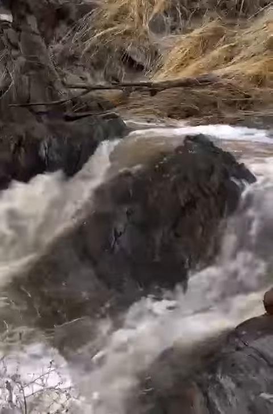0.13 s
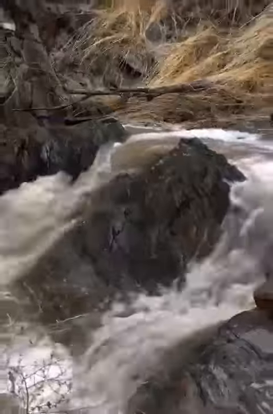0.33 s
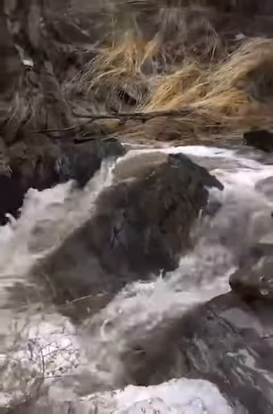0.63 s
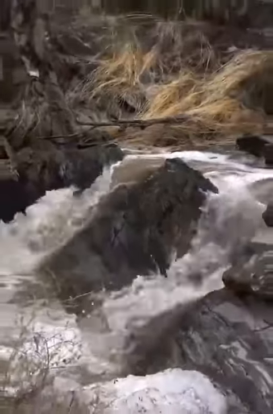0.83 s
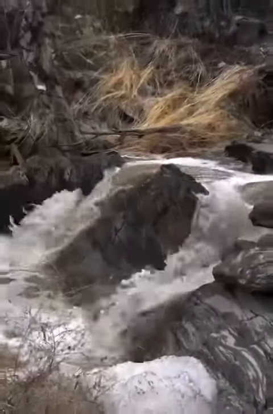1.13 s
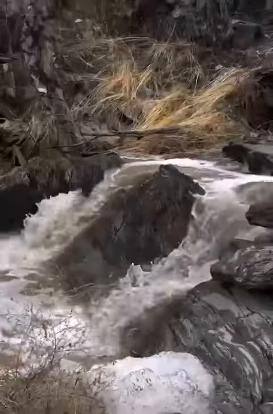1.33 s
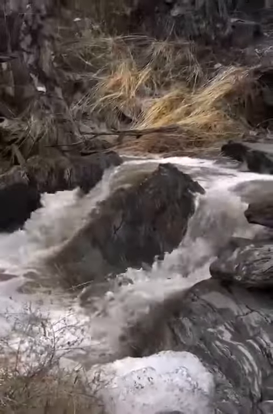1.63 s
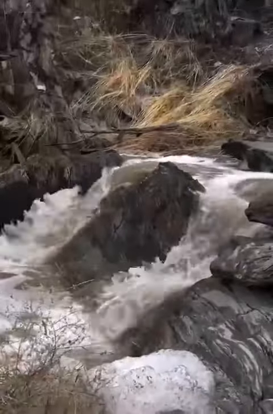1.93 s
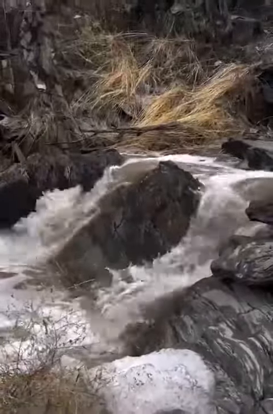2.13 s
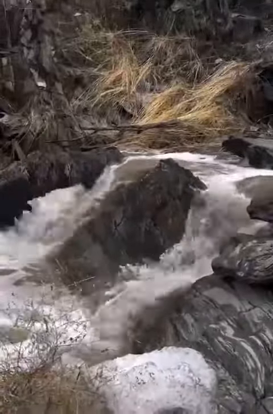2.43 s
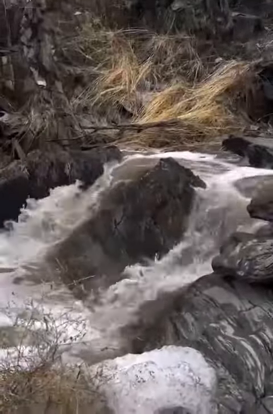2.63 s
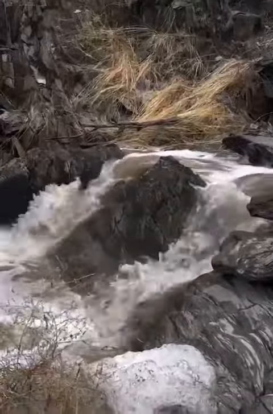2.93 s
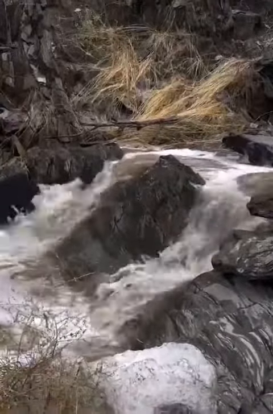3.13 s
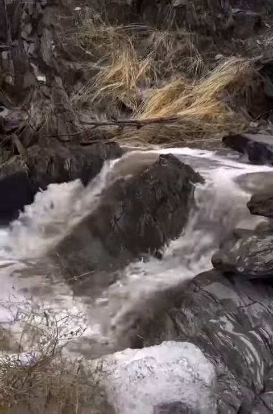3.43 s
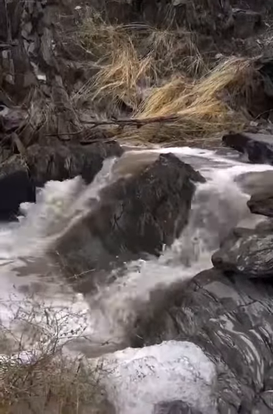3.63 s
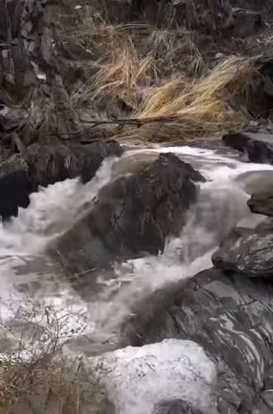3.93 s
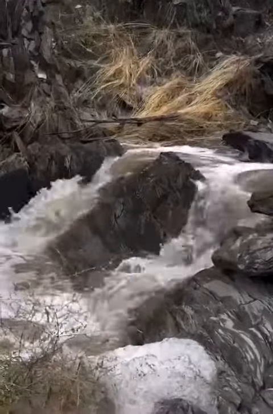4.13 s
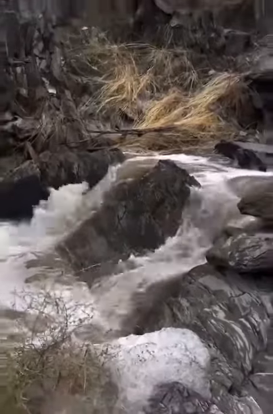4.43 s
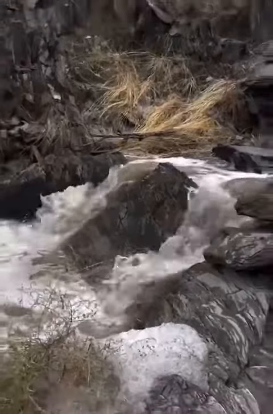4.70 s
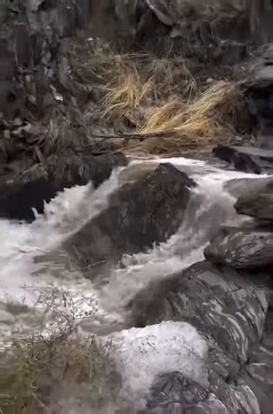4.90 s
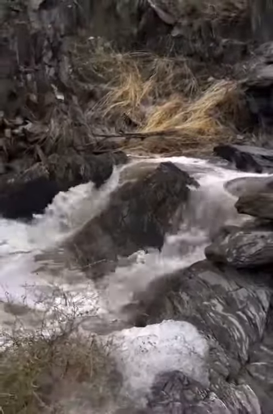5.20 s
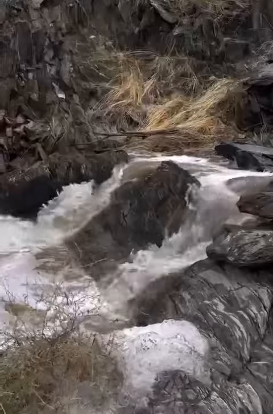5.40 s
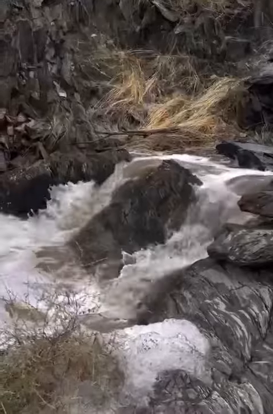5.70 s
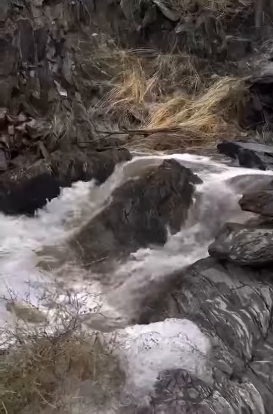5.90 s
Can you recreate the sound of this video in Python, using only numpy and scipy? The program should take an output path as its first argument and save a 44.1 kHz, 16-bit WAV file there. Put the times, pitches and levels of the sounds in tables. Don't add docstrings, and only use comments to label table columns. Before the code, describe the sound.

Outdoors, close to a swollen stream: dense, steady white-water rush, wide in stereo, with fine spray and bubbles. Air thumps the microphone at the start, hardest at a quarter second. Beneath the water, a deep engine drone climbs and strengthens, drops away during a gear shift, sinks in pitch, then slowly builds again from about three and a half seconds until a closing wind bump.

```python
import sys
import numpy as np
from scipy import signal
from scipy.fft import rfft, irfft, next_fast_len
from scipy.io import wavfile
from scipy.ndimage import uniform_filter1d

SR = 44100
rng = np.random.default_rng(int(sys.argv[2]) if len(sys.argv) > 2 else 0)


def dump(signal):
    limited = np.clip(np.atleast_2d(signal).T, -1, 1)
    pcm = np.round(limited * 32767).astype(np.int16)
    wavfile.write(sys.argv[1], SR, pcm)


def gain_from_db(level_db):
    decades = np.asarray(level_db, float) / 20
    return 10 ** decades


N = 267025

# (time [s], roar level [dB])
FLOW = [(0, -32), (1.7, -31.5), (2.1, -32.5), (3.5, -33), (4.2, -32), (6.05, -31.5)]
# (time [s], half length [s], lift [dB])
SLOSH = (1.82, 0.09, 2.4)
SPRAY_DB = 0.36
# (frequency [Hz], density [dB per Hz])
ROAR_SPECTRUM = [(40, -34), (90, -2), (200, -4.5), (400, -7.5), (800, -5.5), (1500, -11), (2500, -16),
                 (4000, -18.5), (5000, -20.5), (7000, -21), (9500, -18), (10900, -12.5), (11500, -15.5),
                 (11900, -32.5)]
# (pitch [Hz], ring [cycles], level [dB], rate [bubbles per s])
BUBBLE_SIZES = [(512, 9.2, -47.5, 60), (773.4, 10, -41.5, 120), (1304, 9.1, -43, 230),
                (2227, 13.3, -44, 540), (3873, 3.7, -47, 900), (7300, 3.6, -57.5, 1800)]

# (frequency [Hz], left-right likeness [0-1])
PORT_LIKENESS = [(250, 1.0), (500, .82), (1100, .7), (1450, .975), (2000, .995), (2750, .93), (3600, .95),
                 (4400, .86), (4890, .993), (6200, .99), (7200, .8), (8150, .97), (8500, .995),
                 (10800, .86)]
# (frequency [Hz], left over right [dB])
PORT_BALANCE = [(110, .5), (200, 1.6), (380, 1.2), (520, 5.1), (1100, 4.7), (1450, 3), (1800, 0.5),
                (2600, 0)]
# (frequency [Hz], left lead [rad])
PORT_LEAD = [(250, 0), (520, .5), (720, 0), (1000, .4), (1250, -.2), (1900, 0), (2800, .3), (4080, .2),
             (4900, 3.14), (5380, 6.03), (6600, 6.45), (7900, 9.0), (10000, 9.8), (11800, 12.2)]

# (time [s], peak [dB], pitch [Hz], t60 [s])
KNOCKS = [
    (.02, -16, 110, 0.065),
    (0.193, -20, 77, 0.06),
    (0.255, -6, 71, 0.042),
    (.405, -27, 69, 0.055),
    (.86, -12, 76, 0.085),
    (1.451, -32, 100, 0.072),
]
# (time [s], peak pressure [dB], half length [s])
GUSTS = [(.04, -36.5, 0.047), (0.315, -31.5, 0.15), (0.772, -37.5, 0.073), (1.01, -38, 0.032),
         (1.44, -43, 0.12), (1.86, -47, 0.057), (2.115, -47, 0.061), (2.742, -49, 0.21), (3.41, -43, 0.072),
         (4.04, -42, .06), (4.78, -41, 0.096), (5.063, -49, 0.065), (5.797, -43, .06), (6.05, -26.5, 0.046)]
# (frequency [Hz], density [dB per Hz])
BUFFET_SPECTRUM = [(12, -54), (20, -20), (70, 9.5), (129, -1.5), (160, -1.5), (184, -7.5), (296, -13),
                   (340, -23), (400, -4.5), (520, -54), (880, -120)]
# (start [s], end [s], pitch [Hz], level [dB])
SWELLING_RINGS = [
    (1.37, 1.55, 600, -30),
    (3.57, 3.9, 185, -27.5),
    (3.92, 4.6, 184, -29.5),
    (3.32, 3.5, 182, -33),
    (2.3, 2.9, 177, -35.5),
]
CALM_DB, GUST_EDGE_DB = -51, 5
APART_DB = -23

# (time [s], firing rate [cycles per s])
FIRING_RATE = [(0, 25.8), (1.5, 30.35), (1.72, 30.75), (1.95, 31), (2.1, 30.2), (2.4, 26.2), (2.8, 22.8),
               (3.05, 21.2), (3.45, 20.3), (4.0, 21.0), (5.8, 23.1), (6.05, 23.2)]
# (time [s], load level [dB])
LOW_LOAD = [(.1, -41.5), (.6, -37.5), (1.1, -30.5), (1.6, -23.5), (1.93, -24.5), (2.08, -38), (2.8, -34.5),
            (3.0, -36.5), (3.4, -57)]
# (time [s], load level [dB])
HIGH_LOAD = [(3.45, -55), (3.72, -42.5), (3.9, -34.5), (4.2, -34), (4.5, -30), (5.2, -24.5), (6.05, -27.5)]
# (multiple of firing cycle [1], level [dB])
LOW_ORDERS = [(1.5, -25), (2, -33), (3, -1), (3.5, -15), (4, -35.5), (5, -18.5), (6, -2), (7, -23),
              (8, -16.5), (9, -13), (10, -22), (11, -25.5)]
# (multiple of firing cycle [1], level [dB])
HIGH_ORDERS = [(1, -38), (2, -24), (3, 0), (4, -28), (5, -2), (6, -6), (7, -14), (8, -7.5), (9, -4),
               (10, -24), (11, -14.5), (12, -13.5), (13, -13), (14, -15.5), (15, -24), (16, -32.5),
               (17, -11.5), (18, -21), (19, -41), (20, -23), (21, -24.5), (22, -19), (23, -20.5)]
# (full level [dB], share of load change [1], load where growth stops [dB])
LOW_FOLLOW = [
    (-23, 1.3, -23),
    (-26, .2, -25.5),
]
# (full level [dB], share of load change [1], load where growth stops [dB])
HIGH_FOLLOW = [
    (-26.5, 1.17, -31),
    (-28, .9, -28.5),
]
# (middle orders [dB], upper orders [dB])
SHUT_DB = [-9, -20]
LIFT_OFF_S, SHUT_S = 1.924, .06
# (frequency [Hz], width [Hz], gain [dB])
PIPE = [(110, 20, 1), (189.7, 3.4, -4.5), (198.7, 9, 8), (212, 12.4, -11), (244.7, 10, 4.5), (264, 6.4, -5),
        (306.5, 12, 6), (347, 3.8, 6.5), (365.4, 11, -9.5), (391, 4, 2), (415, 7, 5.5), (428, 6.4, -7),
        (499, 17, -1)]


def evened(x):
    return x / np.sqrt(np.mean(x ** 2) + 1e-20)


def read(points, hz):
    f, value = np.transpose(points)
    return np.interp(np.log(hz + 1), np.log(f + 1), value)


def curve(rows, t):
    s, value = np.transpose(rows)
    return np.interp(t, s, value)


def drift(t, top_hz):
    rates_hz = np.geomspace(top_hz / 20, top_hz, num=24)
    return evened(sum(np.sin(2 * np.pi * (f * t + rng.random())) / np.sqrt(f) for f in rates_hz))


def field(db, size):
    z = rng.standard_normal(db.T.shape + (2,)).T
    spectrum = (z[0] + 1j * z[1]) * gain_from_db(db)
    return signal.istft(spectrum, nperseg=size, noverlap=size * 3 // 4)[1][:N]


def water():
    t = np.arange(N // 128 + 5) * 128 / SR
    hz = np.fft.rfftfreq(512, 1 / SR)[:, None]
    level_db = curve(FLOW, t)
    slosh_s, half_s, slosh_db = SLOSH
    surge_db = slosh_db * np.clip(1 - abs(t - slosh_s) / half_s, 0, 1)
    high = np.clip(hz / 8000, 0, 1)

    patches = uniform_filter1d(rng.standard_normal((len(t), len(hz))).T, size=6, axis=0)
    patches = evened(uniform_filter1d(patches, size=20, axis=1))
    flicker = evened(uniform_filter1d(rng.standard_normal(len(t)), size=5))

    db = level_db + high * SPRAY_DB + (1 - high) * surge_db
    db = db + (.7 + .5 * high) * patches + (0.2 + 0.3 * high) * flicker + 0.2 * drift(t, 7.8)
    out = np.array([field(db, size=512), field(db, size=512)])
    return evened(out) * gain_from_db(np.mean(level_db) + 0.5)


def bubbles():
    out = np.zeros((2, N))
    for hz, cycles, db, per_s in BUBBLE_SIZES:
        for spread in rng.uniform(0.761, 1.268, size=5):
            ring_hz = hz * spread
            u = np.arange(int(3 * cycles * SR / ring_hz)) / SR * ring_hz / cycles
            ring = np.sin(2 * np.pi * cycles * (u + 0.13 * u ** 2)) * u * np.exp(-3 * u)
            size = gain_from_db(3.4 * np.minimum(rng.exponential(1, (2, N)), 5))
            size *= rng.random((2, N)) < per_s / 5 / SR
            rings = signal.oaconvolve(size, ring[None], axes=1)[:, :N]
            out += gain_from_db(db) * evened(rings) / np.sqrt(5)
    return out


def wind():
    t = np.arange(N // 512 + 5) * 512 / SR
    hz = np.fft.rfftfreq(2048, 1 / SR)[:, None]
    fine = np.arange(N) / SR
    both, apart = [evened(field(read(BUFFET_SPECTRUM, hz) + 0 * t, size=2048)) for part in range(2)]
    out = both + gain_from_db(APART_DB) * np.outer([1, -1], apart)

    pressure = gain_from_db(CALM_DB)
    for s, db, half_s in GUSTS:
        pressure = pressure + gain_from_db(db - GUST_EDGE_DB * ((t - s) / half_s) ** 2)
    out = out * np.interp(fine, t, pressure * gain_from_db(5.5 + 0.83 * drift(t, 25.0)))

    for s, db, knock_hz, t60_s in KNOCKS:
        u = np.clip(fine - s, 0, 1)
        out += gain_from_db(db - 60 * u / t60_s) * (1 - np.exp(-u / 0.0055)) * np.sin(-2 * np.pi * knock_hz * u)
    for start_s, end_s, ring_hz, db in SWELLING_RINGS:
        swell = np.sin(np.pi * np.clip((fine - start_s) / (end_s - start_s), 0, 1))
        out += gain_from_db(db) * swell * np.sin(2 * np.pi * ring_hz * fine)
    return out


def engine(load, orders, follow, shut, wobble_db, jitter):
    t = np.arange(0, N + 64, 64) / SR
    fine = np.arange(N) / SR
    rate_hz, load_db = curve(FIRING_RATE, t), curve(load, t)
    closed = shut * np.clip((t - LIFT_OFF_S) / SHUT_S, 0, 1)
    groups_db = []
    for (full_db, share, stop_db), drop_db in zip(follow, SHUT_DB):
        groups_db.append(full_db + share * np.minimum(load_db - stop_db, 0) + drop_db * closed)
    middle_db, upper_db = groups_db

    turns = np.cumsum(np.interp(fine, t, rate_hz * (1 + jitter * drift(t, 8.0)))) / SR
    on = np.clip(np.minimum(t - load[0][0], load[-1][0] + .05 - t) / .05, 0, 1)
    out = np.zeros(N)
    for k, db in orders:
        pipe_db = sum(g / (1 + ((k * rate_hz - f) / w) ** 2) for f, w, g in PIPE)
        group_db = load_db if k < 4.5 else middle_db if k < 8.5 else upper_db
        waver_db = wobble_db * k / 3 * drift(t, 11.0)
        gain = on * gain_from_db(group_db + db + pipe_db + waver_db)
        out += np.sqrt(2) * np.interp(fine, t, gain) * np.cos(2 * np.pi * (k * turns + rng.random()))
    return out


def ports(roar, foam, hum):
    size = next_fast_len(N)
    hz = np.fft.rfftfreq(size, 1 / SR)
    colour = gain_from_db(read(ROAR_SPECTRUM, hz))
    colour /= np.sqrt(np.mean(colour ** 2 * (hz > 600) * (hz < 3000)))
    a, b = rfft(roar, size) * colour + rfft(foam, size)
    hum = rfft(hum, size)
    same = np.clip(read(PORT_LIKENESS, hz), 0, 1)
    turn = gain_from_db(read(PORT_BALANCE, hz) / 2) * np.exp(.5j * read(PORT_LEAD, hz))
    left = (a + hum) * turn
    right = (same * a + np.sqrt(1 - same ** 2) * b + hum) / turn
    return irfft(np.array([left, right]), size)[:, :N]


def scene():
    air = wind()
    hum = engine(LOW_LOAD, LOW_ORDERS, LOW_FOLLOW, shut=1, wobble_db=.45, jitter=.002)
    hum = hum + engine(HIGH_LOAD, HIGH_ORDERS, HIGH_FOLLOW, shut=0, wobble_db=.65, jitter=.002)
    return ports(water(), bubbles(), hum) + air


def top_cut(x):
    return signal.sosfilt(signal.butter(12, 13010, fs=SR, output="sos"), x)


def record(dry):
    low_cut = signal.butter(2, 42.0, "high", fs=SR, output="sos")
    mix = signal.sosfilt(low_cut, dry)
    return top_cut(mix)


dry = scene()
out = record(dry)
dump(out)
```